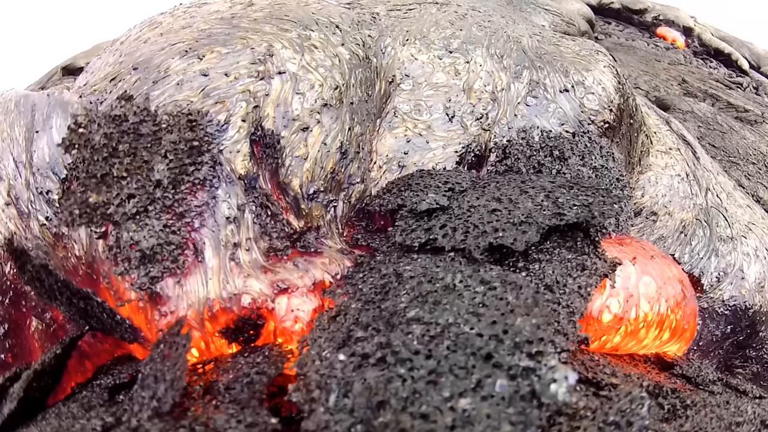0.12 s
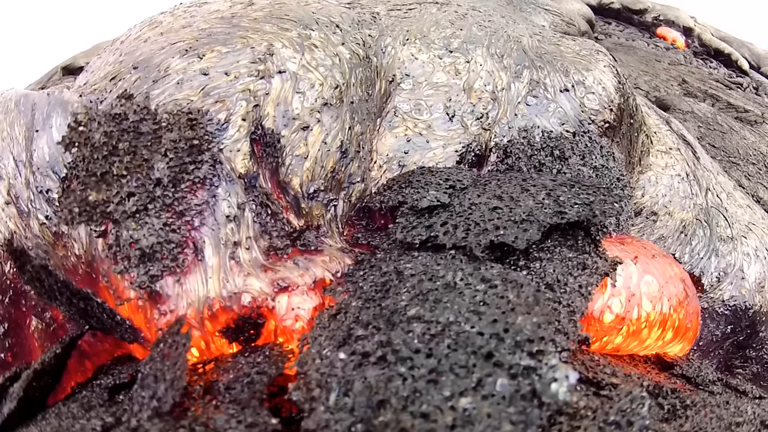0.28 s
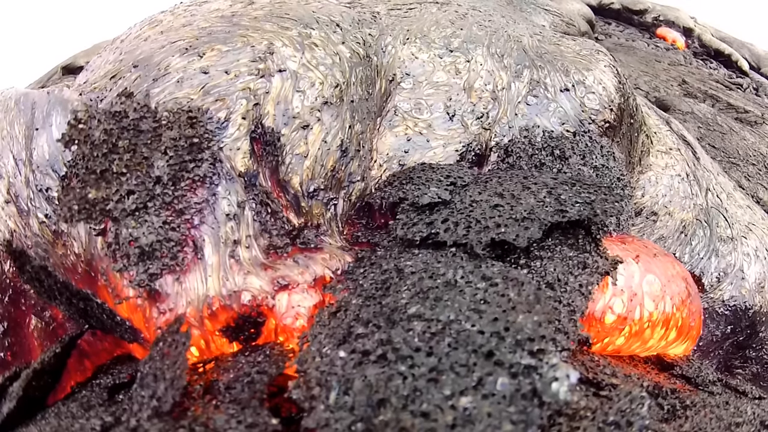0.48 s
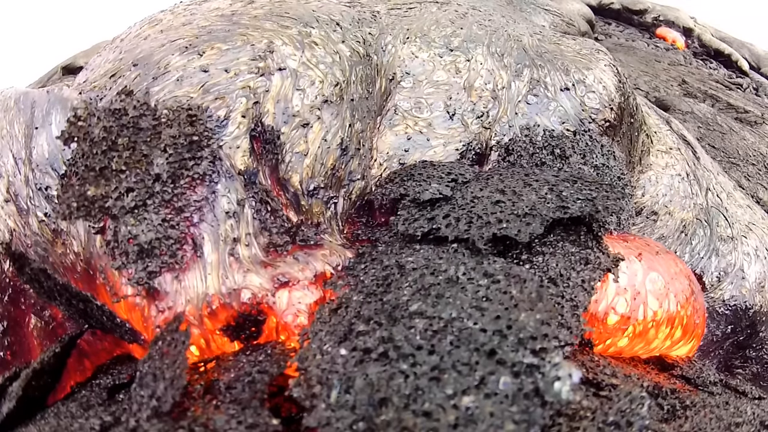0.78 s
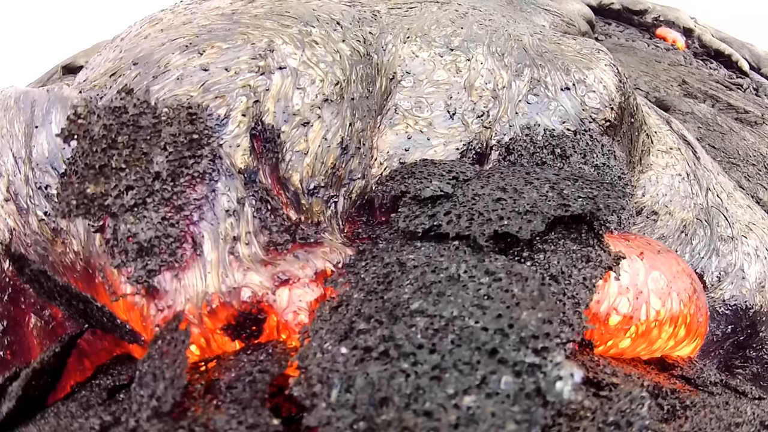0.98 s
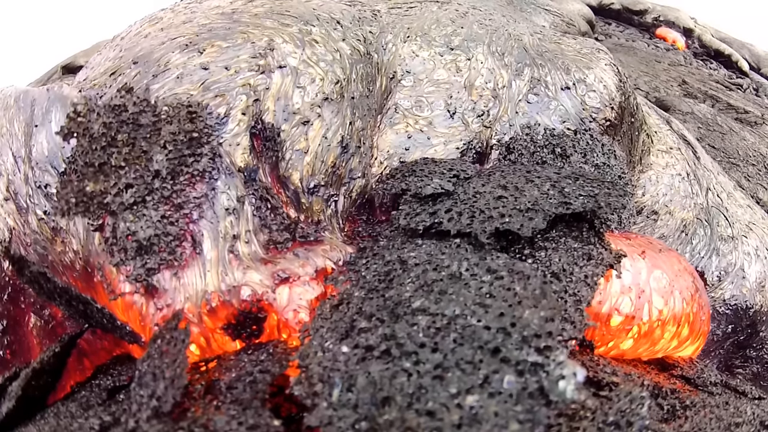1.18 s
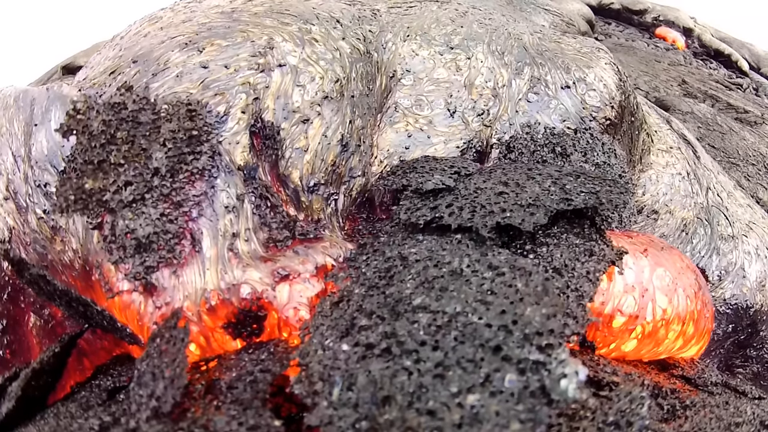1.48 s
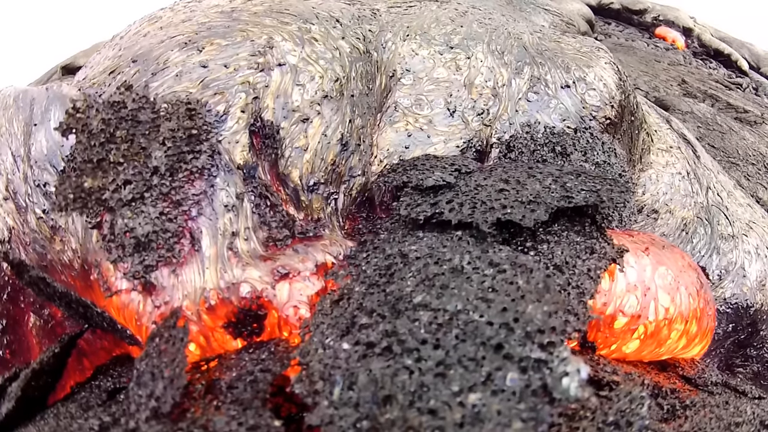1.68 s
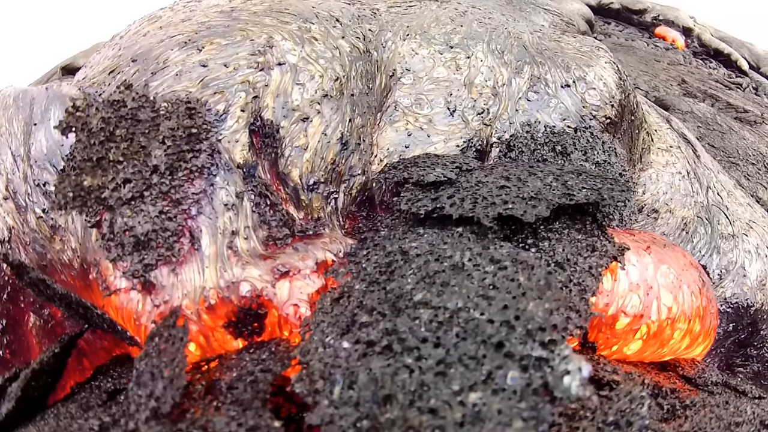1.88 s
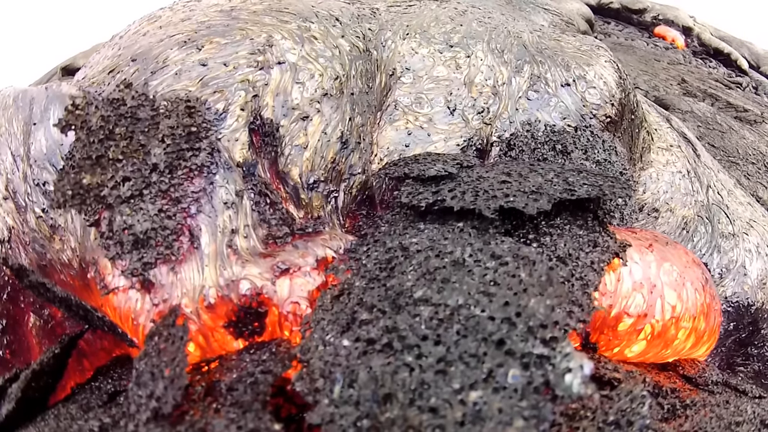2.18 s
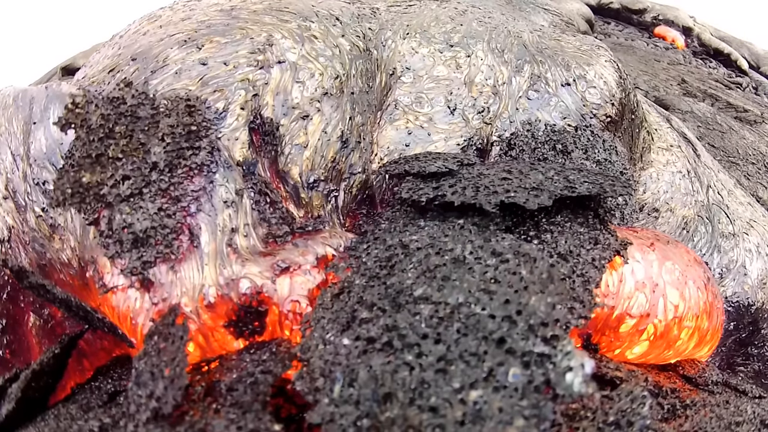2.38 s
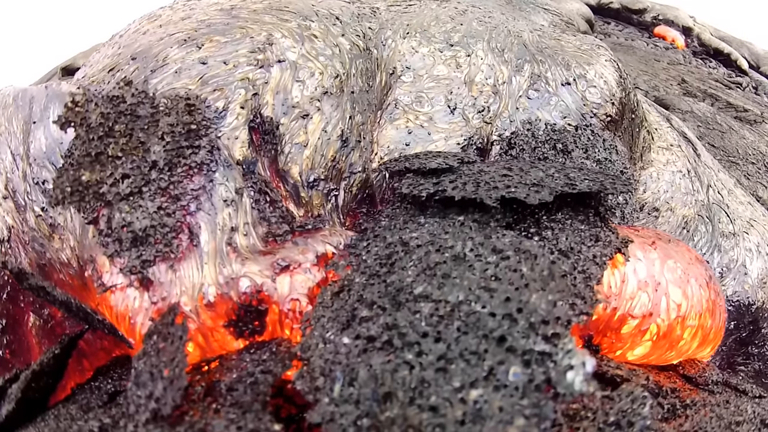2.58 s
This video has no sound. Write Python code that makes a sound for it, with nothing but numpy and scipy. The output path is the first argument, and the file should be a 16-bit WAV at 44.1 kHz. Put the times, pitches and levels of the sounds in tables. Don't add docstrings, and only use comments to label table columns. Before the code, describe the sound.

Cooling lava crust snaps and crumbles in dense, uneven crackles, each crack ringing briefly in a thin closed shell. Glassy flakes click, while faint gas hiss and low thumps sit beneath; very close, dry, nearly mono.

```python
import sys
import numpy as np
from scipy import signal
from scipy.fft import rfft, irfft, next_fast_len
from scipy.io import wavfile
from scipy.ndimage import uniform_filter1d, map_coordinates

SR = 44100
rng = np.random.default_rng(int(sys.argv[2]) if len(sys.argv) > 2 else 0)


def bounce(signal):
    frames = np.transpose(np.atleast_2d(signal))
    limited = np.clip(frames, -1, 1)
    pcm = np.round(limited * 32767).astype(np.int16)
    wavfile.write(sys.argv[1], SR, pcm)


def attenuation_scalar(level_db):
    decades = np.asarray(level_db, float) / 20
    return 10 ** decades


N = 119070

# pitch in Hz, width in Hz, level in dB.
WALL_TONES = [(1095, 450, -18.5), (1360, 55, 4), (1527, 51, -6), (1790, 61, 5.5), (2117, 173, 8),
              (2284, 75, 9.5), (2620, 70, 4.5), (3024, 290, 6.5), (2940, 570, -8.5), (3860, 240, 10),
              (4320, 520, -9)]


def unit(x):
    return x / np.sqrt(np.mean(x ** 2) + 1e-20)


def curve(rows):
    s, v = np.transpose(rows)
    return np.interp(np.arange(N) / SR, s, v)


def wobble(rate):
    points = rng.standard_normal(int(N * rate / SR) + 4)
    return map_coordinates(points, [np.arange(N) * rate / SR])


def swell(middle_s, half_s):
    return np.exp(-((np.arange(N) / SR - middle_s) / half_s) ** 2)


def filtered(x, response):
    m = next_fast_len(N + SR // 2)
    return irfft(rfft(x, m) * response(np.fft.rfftfreq(m, 1 / SR)), m)[..., :N]


def resonance(f, hz, width_hz):
    push = 1j * f * width_hz
    return push / (hz * hz - f * f + push)


def rush(points):
    f, db = np.transpose(points)
    gain = lambda hz: attenuation_scalar(np.interp(np.log(hz + 1), np.log(f + 1), db, right=-120))
    return unit(filtered(rng.standard_normal(N), gain))


def ringing(x, modes, sign):
    top_hz = 4134

    def walls(f):
        tones = sum(sign ** k * attenuation_scalar(db) * resonance(f, hz, width) for k, (hz, width, db) in enumerate(modes))
        return tones / (1 + 1.2j * f / top_hz - (f / top_hz) ** 2) ** 4

    power_gain = np.mean(np.abs(walls(np.linspace(1, SR / 2, 4000))) ** 2)
    return filtered(x, walls) / np.sqrt(power_gain)


def shell_body(x):
    low_hz, high_hz = 447, 868
    pole = lambda u: 1 / (1 + 0.8j * u - u * u)
    upper = lambda f: pole(f / high_hz) * pole(f / (1.64 * high_hz)) / np.sqrt(2)
    return filtered(x, lambda f: upper(f) * pole(-low_hz / (f + 1)))


def grit(depth_db):
    size = wobble(700) + 0.68 * wobble(150)
    size = np.minimum(size, 2.55)
    return unit(rng.standard_normal(N) * attenuation_scalar(depth_db * size))


def ticking():
    # time in seconds, level in dB.
    tick_levels = [
        (0.0, -54),
        (0.34, -50.5),
        (2.26, -53),
        (2.7, -52.5),
    ]
    # middle in seconds, half length in seconds, depth in dB.
    pauses = [
        (0.224, 0.016, -2),
        (0.42, 0.011, 0),
        (0.695, 0.017, -7),
        (0.934, 0.042, -8.5),
        (1.505, 0.0079, -30),
        (1.71, 0.077, -6),
        (1.845, 0.017, -28),
        (2.424, 0.011, -8),
        (2.504, 0.063, -8.5),
    ]
    lull_db = sum(db * swell(s, half) for s, half, db in pauses)
    wobble_db = 2.2 * (wobble(24.54) + wobble(70))
    bright_db = -9
    return attenuation_scalar(curve(tick_levels) + lull_db + wobble_db) * attenuation_scalar([[0], [bright_db]])


def gas():
    # frequency in Hz, level in dB per Hz.
    thump_colour = [(12, -28), (20, -1), (75, 1), (125, -4), (168, -13), (200, -2), (260, -33), (440, -120)]
    # frequency in Hz, level in dB per Hz.
    hiss_colour = [(30, -3.5), (150, 2.5), (400, 0), (1000, -25.5), (2500, -21), (4500, -20.5),
                   (5900, -29.5)]
    # middle in seconds, half length in seconds, level in dB, pitch in Hz.
    puffs = [(0.103, 0.036, -57, 40), (0.526, 0.024, -44, 66), (0.565, 0.031, -51, 30),
             (0.708, 0.031, -55, 59), (0.995, 0.018, -51.5, 70), (1.28, 0.036, -46, 48.3),
             (1.5, 0.032, -52, 40), (1.678, 0.018, -38, 40), (1.716, 0.041, -45.5, 67.4),
             (1.755, .02, -47.5, 105), (1.828, 0.0099, -42, 70), (1.928, 0.046, -45.5, 45),
             (2.001, 0.011, -44, 70), (2.112, 0.045, -41, 72.4), (2.24, 0.027, -61, 60),
             (2.339, 0.02, -42.5, 73), (2.495, 0.14, -56.5, 37.7)]
    air = unit(attenuation_scalar(2 * wobble(14)) * rush(thump_colour))
    thump = attenuation_scalar(-64) * air
    for s, half, db, hz in puffs:
        band = lambda f: resonance(f, hz, 0.54 * hz)
        thump = thump + attenuation_scalar(db) * np.sqrt(swell(s, half)) * unit(filtered(air, band))
    hiss_db = -56 + 2 * wobble(8.73)
    return thump + attenuation_scalar(hiss_db) * rush(hiss_colour)


def snaps():
    # start in seconds, peak in dB, brightness in dB.
    cracks = [(0.031, -49, 18), (0.056, -36, 6), (0.127, -29, -3.5), (0.144, -31.5, 5.5), (0.193, -21, -6),
              (0.236, -10, -13.5), (0.241, -15.5, -9), (0.302, -33, -7), (0.314, -31, -1.5),
              (0.328, -20.5, -22), (0.35, -19.5, -9), (0.393, -22.5, -16), (0.435, -30.5, -4.5),
              (0.46, -37.5, 11.5), (0.491, -15, -12.5), (0.515, -26, -6), (0.524, -26, -10),
              (0.548, -22, -19), (0.585, -20.5, -15), (0.609, -29.5, -13), (0.633, -35.5, 7.5),
              (0.663, -33.5, -0.5), (0.709, -31, -4), (0.733, -6, -4), (0.747, -18, -10), (0.78, -28, 2.5),
              (0.794, -21.5, -16), (0.835, -19.5, -19.5), (0.863, -24, -8), (0.961, -12, -6.5),
              (0.978, -12, -8.5),
              (0.998, -31, -18), (1.018, -27.5, -6), (1.034, -23.5, -1.5), (1.061, -19.5, -9),
              (1.071, -21, -20), (1.102, -23, -12), (1.138, -31.5, -6.5), (1.157, -17, -10.5),
              (1.235, -32, -12), (1.245, -30, -3.5), (1.254, -28.5, -7), (1.267, -19, -9), (1.331, -28, -8),
              (1.39, -19, -13), (1.434, -26, -8), (1.469, -23, -20.5), (1.489, -37, -4), (1.509, -49, -8),
              (1.52, -9, -20), (1.528, -32, 6), (1.545, -18, -24), (1.557, -16.5, -11.5),
              (1.578, -18.5, -10), (1.6, -21.5, -8), (1.62, -13, -19), (1.629, -18, -13.5),
              (1.646, -23.5, -19), (1.718, -42, 6.5), (1.731, -21.5, -2.5),
              (1.778, -39, 6.5), (1.797, -18, -9), (1.807, -20, -16), (1.86, -29.5, 5), (1.892, -50, -13),
            (1.904, -23.5, -2), (1.909, -31.5, 6.5), (1.936, -15.5, -17), (1.968, -25.5, -6.5),
            (2.006, -23, -38), (2.024, -20, -14), (2.041, -20, -33), (2.152, -17, -23), (2.165, -18.5, -28),
            (2.187, -22.5, -31), (2.248, -32, 1.5), (2.264, -23.5, -12), (2.328, -27, -17),
            (2.351, -31.5, -10), (2.414, -25.5, 3.5), (2.429, -25, -21), (2.461, -27.5, 2),
            (2.618, -30.5, -7.5), (2.683, -32, -4.5)]
    burst_db, extra_bright_db = -14, 0.5
    blow_db = [18.5, 22]
    t60 = np.array([[0.014], [0.023]])
    delay_s, blow_s = 0.0008, 0.00017
    tail = np.arange(SR // 5) / SR
    fade = attenuation_scalar(-60 * tail / t60)
    power, blows = np.zeros((2, N + SR)), np.zeros((2, N))
    for s, db, bright_db in cracks:
        start = round((s + delay_s) * SR)
        dull_db = db + burst_db
        size = attenuation_scalar([dull_db, dull_db + extra_bright_db + bright_db])
        power[:, start:start + len(tail)] += (size[:, None] * fade) ** 2
        blows[:, start] += size * attenuation_scalar(blow_db)
    blows = filtered(blows, lambda f: 1 / (1 + 1j * f * blow_s) ** 2)
    return power[:, :N], blows


def crumbles():
    # middle in seconds, half length in seconds, level in dB, brightness in dB.
    patches = [(0.251, 0.012, -43, 3.5), (0.317, 0.0045, -41.5, -4.5), (0.461, 0.0086, -56.5, 10),
               (0.532, 0.022, -41.5, -7.5), (0.623, 0.012, -46.5, -4), (0.731, 0.009, -35, -8),
               (0.742, 0.0092, -34.5, -20), (0.844, 0.012, -41.5, -18.5), (1.052, 0.0061, -39, -5),
               (1.079, 0.011, -44, -5), (1.256, 0.0092, -54, -1), (1.539, 0.013, -37.5, -13.5),
               (1.803, 0.01, -37, -8), (1.89, 0.0096, -49, -2), (1.919, 0.035, -39, -12.5),
               (2.057, 0.018, -41.5, -15.5), (2.208, 0.0099, -32.5, -9), (2.266, 0.0055, -39.5, -11),
               (2.425, 0.012, -50, -31)]
    return sum(attenuation_scalar([[db], [db + bright_db]]) ** 2 * swell(s, half) for s, half, db, bright_db in patches)


def crust():
    # pitch in Hz, width in Hz, level in dB.
    body_tones = [(496, 63, 2.5), (593, 61, 1), (682, 76, 1), (760.7, 71, 8), (849, 45, 3), (929, 17, -0.5)]
    # pitch in Hz, width in Hz, level in dB.
    straight_through = [(2600, 4000, 0)]
    ticks = ticking()
    power, blows = snaps()
    power = power + crumbles()
    dull, bright = (np.sqrt(power[k]) * grit(3.5) + blows[k] + ticks[k] * grit(6) for k in range(2))
    body = shell_body(ringing(dull, body_tones, 0.88))
    walls = ringing(bright, WALL_TONES, 0.98)
    through = attenuation_scalar(-12.5) * ringing(bright, straight_through, 1)
    knock = attenuation_scalar(-10) * ringing(dull, [(307, 250, 0)], 1)
    return body + walls + through + knock


def chips():
    # start in seconds, peak in dB, pitch in Hz.
    splinters = [(0.0837, -35, 2060), (0.2304, -40, 2100), (0.2404, -21.5, 2040), (0.2554, -39, 2050),
                 (0.2694, -31, 2120), (0.2857, -30.5, 2220), (0.4044, -40, 2020), (0.4219, -40, 2230),
                 (0.4444, -34, 1790), (0.4514, -32, 2040), (0.4754, -31, 2320), (0.5536, -24, 2050),
                 (0.6165, -33, 2080), (0.7084, -33, 1750), (0.7188, -30, 2070), (0.7337, -11.5, 2170),
                 (0.7994, -30, 1780), (0.8184, -49, 1250), (0.8405, -32, 2940), (0.9607, -14.5, 2460),
                 (1.052, -37, 2110), (1.2176, -42, 2180), (1.294, -51, 1780), (1.3259, -37, 2320),
                 (1.5194, -15.5, 1730), (1.5479, -29, 2150), (1.5803, -34, 2280), (1.6736, -44, 2270),
                 (1.6866, -39, 2330), (1.719, -39, 2290), (1.7554, -57, 1340), (1.8826, -35, 2370),
                 (2.0293, -33, 2070), (2.0477, -31, 2300), (2.0644, -33, 2260), (2.1216, -33, 2030),
                 (2.1425, -32, 1340), (2.1964, -33, 2140), (2.2009, -17.5, 2170), (2.2214, -35, 2100),
                 (2.2714, -50, 2270), (2.2844, -53, 2140), (2.3067, -56, 2120), (2.3674, -46, 2930),
                 (2.3865, -39.5, 2930), (2.4144, -24, 2940), (2.4544, -34, 2060), (2.4618, -21.5, 3130),
                 (2.5376, -54, 2960), (2.5601, -50, 2070), (2.6005, -31.5, 1340)]
    s, db, hz = np.transpose(splinters)[:, :, None]
    t = np.arange(SR // 50) / SR
    rough = 1 + 2 * uniform_filter1d(rng.standard_normal((len(s), len(t))), size=4, axis=1)
    fade = attenuation_scalar(db - 6.5 - 60 * t / 0.0042)
    rise = 1 - np.exp(-t / 0.00039)
    shape = fade * rise * np.sin(2 * np.pi * hz * t) * rough
    place = np.round((s + t) * SR).astype(int)
    force = np.bincount(place.ravel(), shape.ravel(), N)[:N]
    return ringing(force, WALL_TONES, 1)


def pricks():
    # start in seconds, peak in dB.
    flakes = [(0.2522, -12.5), (0.3655, -48), (0.7193, -42.5), (0.9333, -32), (1.1542, -32), (1.184, -34),
              (1.197, -31), (1.217, -36), (1.509, -42), (1.68, -34.5), (2.084, -29), (2.108, -25),
              (2.1225, -27), (2.283, -39), (2.359, -42), (2.386, -52)]
    s, db = np.transpose(flakes)
    click = np.bincount(np.round(s * SR).astype(int), attenuation_scalar(db + 9), N)
    return filtered(click, lambda f: resonance(f, 4000, 870))


def scene():
    return np.tile(crust() + gas() + chips() + pricks(), (2, 1))


def slowed(dry):
    hold_hz, full_hz = 12000, 48000
    base = filtered(dry, lambda hz: hz < hold_hz / 2)
    mirrored = base * (1 + 2 * np.cos(2 * np.pi * hold_hz * np.arange(N) / SR))
    top = lambda hz: attenuation_scalar(-24 * np.maximum(hz - 15250, 0) / 1000)
    held = filtered(mirrored, lambda hz: np.sinc(hz / hold_hz) / np.sinc(hz / full_hz) * top(hz))
    above = filtered(held, lambda hz: hz > 15750)
    quiet = uniform_filter1d(np.abs(above), size=256) < attenuation_scalar(-82)
    return held - above * uniform_filter1d(1.0 * quiet, size=128)


def side_residue(held):
    # frequency in Hz, level in dB under the middle.
    side_colour = [(60, -45), (180, -33), (380, -38), (700, -68), (1300, -34), (2400, -33), (4400, -25),
                   (15000, -24)]
    f, db = np.transpose(side_colour)
    gain = lambda hz: attenuation_scalar(11 + np.interp(np.log(hz + 1), np.log(f), db))
    leak = filtered(np.roll(held[0], 40), gain)
    return leak * (wobble(25) > 0.9)


def low_pass(x):
    return signal.sosfilt(signal.butter(12, 16470, fs=SR, output="sos"), x)


def record(dry):
    held = slowed(dry)
    residue = side_residue(held)
    return low_pass(held + [residue, -residue])


dry = scene()
out = record(dry)
bounce(out)
```